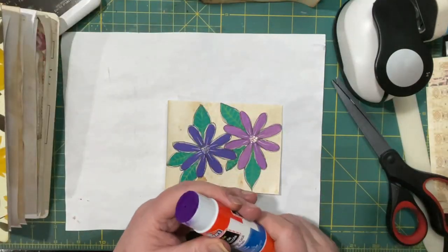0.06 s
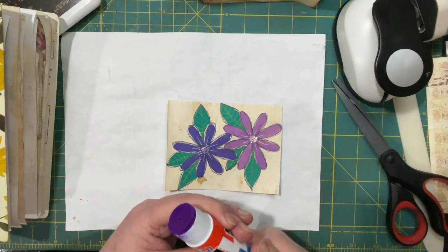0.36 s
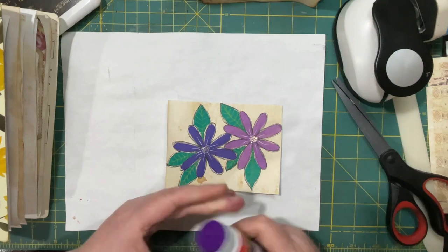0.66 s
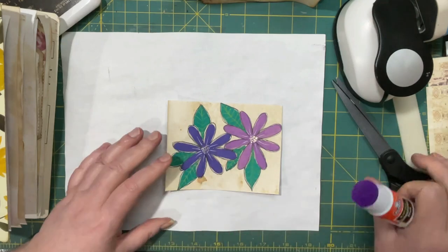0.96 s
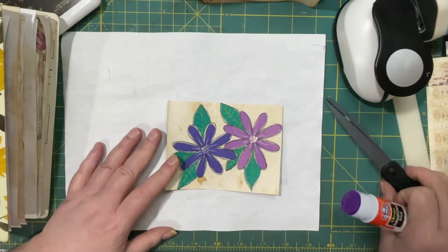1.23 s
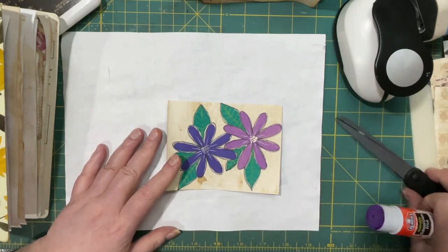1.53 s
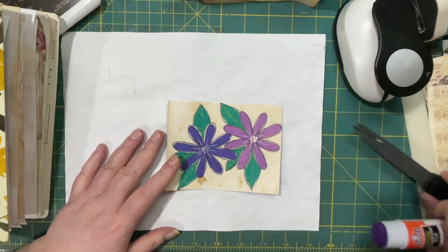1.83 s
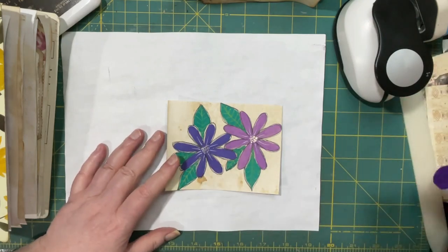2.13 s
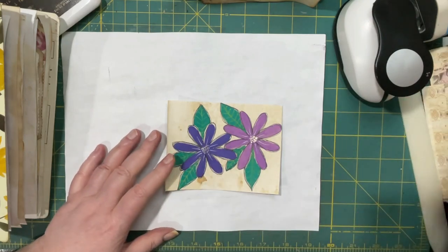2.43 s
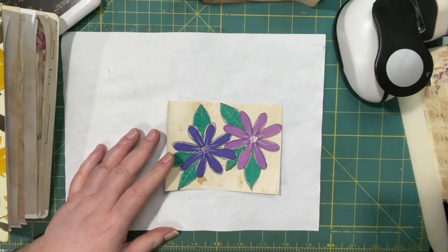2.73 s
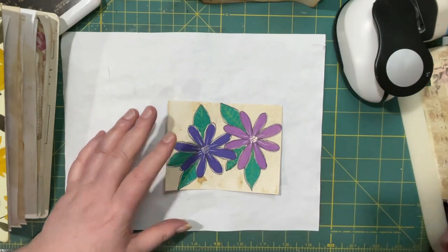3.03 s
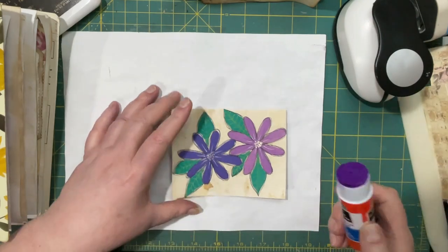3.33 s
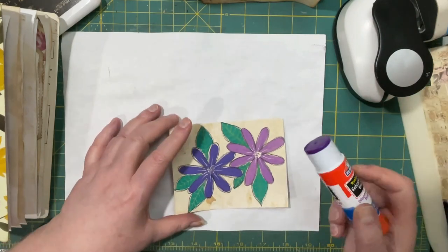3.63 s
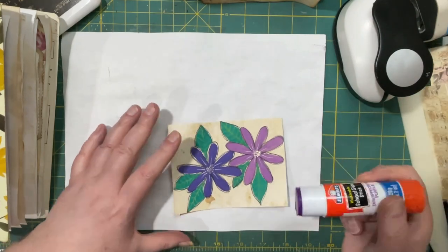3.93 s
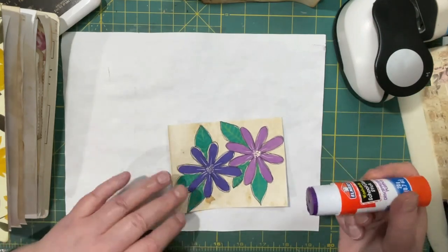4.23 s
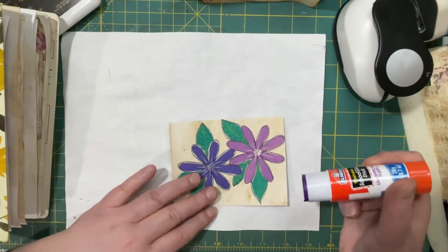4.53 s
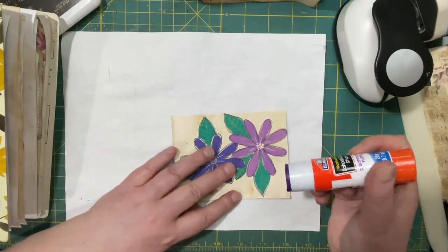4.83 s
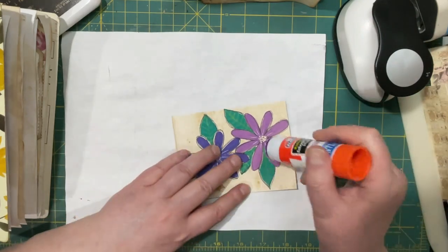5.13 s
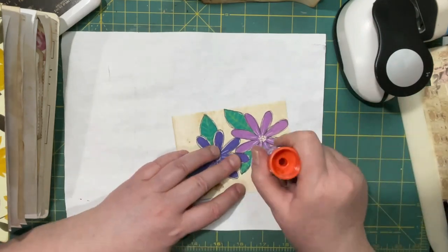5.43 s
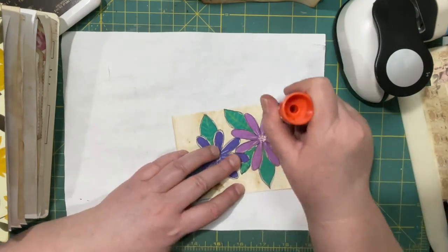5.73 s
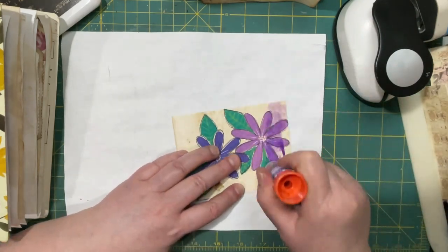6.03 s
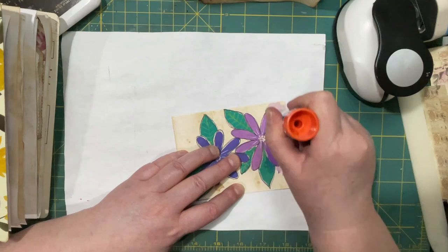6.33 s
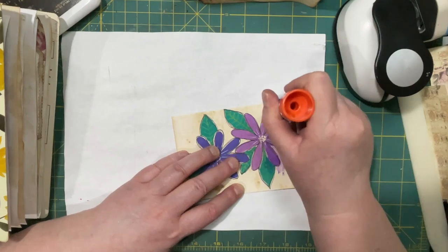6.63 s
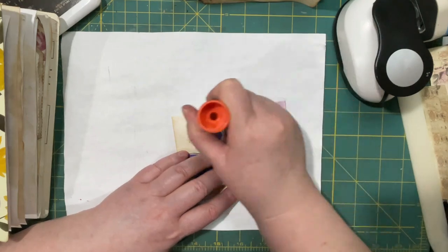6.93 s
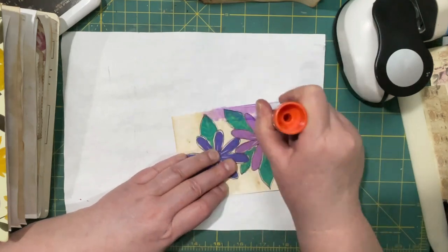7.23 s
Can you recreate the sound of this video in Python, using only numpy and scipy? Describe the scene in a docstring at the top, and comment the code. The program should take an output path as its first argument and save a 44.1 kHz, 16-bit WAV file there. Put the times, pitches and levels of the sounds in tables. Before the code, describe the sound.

Close by on a crafting table in a quiet room, a glue stick's cap comes off with a few faint rubs. The loudest part follows: scissors drag over a mat and clatter against tools in two bursts, with dull table knocks. Then a card swishes across paper as fingernails tap it, and after a soft thump a glue stick smears over the card in repeated, softly ticking strokes.

```python
"""First you hear the cap slide off a glue stick, close by on a crafting table in a small, quiet room.
Scissors judder over the cutting mat, then clack and ring among other tools while the table thumps.
Fingers slide a card over paper: the fibres hiss, and fingernails tap the card. The glue stick lands
with a soft thump and is rubbed about with small tacky ticks. Rubbing is made of many tiny slips;
a knock is a short push that makes an object ring at its own notes (its modes)."""
import sys
import numpy as np
from scipy import signal
from scipy.fft import rfft, irfft
from scipy.io import wavfile
from scipy.ndimage import uniform_filter1d

SR = 44100
rng = np.random.default_rng(int(sys.argv[2]) if len(sys.argv) > 2 else 0)


def transcribe(signal):
    """Save signal, clipped to [-1, 1], as a 16-bit WAV file at the path in sys.argv[1]."""
    frames = np.atleast_2d(signal).T
    limited = np.clip(frames, -1, 1)
    pcm = np.round(limited * 32767).astype(np.int16)
    wavfile.write(sys.argv[1], SR, pcm)


N = 320166
TIME = np.arange(N) / SR
FREQS = np.maximum(np.arange(N // 2 + 1) * SR / N, 1)

# Levels compare rows within a table; each layer then sets its own volume. A decay is a 60 dB fade.
# the room's steady background noise: (frequency [Hz], level [dB])
ROOM_TONE = [(25, -1.5), (45, 6), (90, -2), (260, -9), (480, -5), (750, -12.5), (1050, -8), (1600, -22.5),
             (6000, -33), (15500, -36)]
# how alike the background noise and echoes sound in left and right; the top treble is narrow:
# (frequency [Hz], likeness [about -1 to 1])
LIKENESS = [(80, 0.99), (200, 0.19), (400, 0.021), (800, -1.06), (1500, 0.62), (3500, 0.2), (5000, -0.88),
            (6500, 1)]
# how far the left microphone's wave runs ahead: (frequency [Hz], phase [rad])
MIC_PHASE = [(150, 0), (800, -.7), (1500, 0), (4200, .3), (4750, 3.14), (5200, 6.2), (7500, 7.8),
             (10100, 9.42), (14800, 12.4)]
# how much louder the left microphone is: (frequency [Hz], level [dB])
MIC_BALANCE = [(60, 0), (170, 1.5), (600, 3.8), (1400, 1), (4400, -2.5), (5500, 0)]
# hands leaning on the table: (time [s], level [dB])
LEAN = [(2.6, -70), (3.98, -72), (4.03, -52), (4.16, -98), (4.82, -55), (5.2, -80)]
# the rumble they make: (frequency [Hz], level [dB])
RUMBLE_TONE = [(25, -34), (50, -13.5), (80, 6), (140, -15.5), (300, -13), (800, -26.5)]
# notes of the table top: (frequency [Hz], level [dB], decay [s])
TABLE_MODES = [(86, -3, 0.14), (138, -0.5, 0.13), (175.5, -1.5, 0.16), (250, -2, 0.04), (322, 3.5, 0.074),
               (380.6, -8.5, 0.1), (497, -3, 0.2), (581, -5, 0.12), (771, -4.5, 0.088)]
# soft blows on the table: (time [s], level [dB], contact time [s])
THUMPS = [(1.089, -22.5, 0.0015), (1.112, -22, 0.0056), (1.149, -23, 0.0015), (1.218, -30.5, 0.006),
          (1.334, -27.5, 0.0035), (1.382, -14, 0.0031), (1.388, -22, 0.0011), (1.404, -23.5, 0.0017),
          (1.504, -35, 0.0055), (2.128, -32, 0.013), (2.195, -19.5, 0.0016), (4.022, -42, 0.0095),
          (4.464, -44.5, 0.0097), (5.391, -34, 0.00093), (5.392, -24, 0.0097), (7.229, -35.5, 0.0023)]

# cap twisted and pulled along the tube: (start [s], fastest [s], end [s], level [dB])
CAP_STROKES = [(0.02, 0.055, 0.082, -54), (0.185, 0.215, 0.36, -59.5), (0.445, 0.465, 0.49, -56),
               (0.485, 0.52, 0.56, -54)]
# note of the air in the cap: (time [s], pitch [Hz])
CAP_PITCH = [(0.06, 3000), (0.2, 2380), (0.46, 2520), (0.51, 2610), (0.56, 2790)]
# hiss of the cap's rim: (frequency [Hz], width [Hz], level [dB])
RIM_MODES = [(6760, 370, -10), (7100, 12000, 0), (12120, 340, 3.5)]

# hiss of rubbed paper: (frequency [Hz], level [dB])
PAPER_TONE = [(800, -14), (1600, -8), (3000, -2.5), (4400, -5), (6100, 1.5), (8000, -1.5), (10300, -5.5),
              (12500, -0.5), (14300, -8.5), (15800, -10)]
# a hand sweeping over the paper towards the card: (time [s], level [dB])
REACH = [(0.56, -60), (0.66, -60.5), (0.76, -53.5), (1.15, -49.5), (1.22, -77.5)]
# fingers pushing the card: (start [s], fastest [s], end [s], level [dB], edge bite [dB])
CARD_STROKES = [(2.85, 2.905, 2.944, -56.5, -4.5), (3.0, 3.23, 5.8, -67.5, -8), (3.3, 3.32, 3.39, -42, 1),
                (3.435, 3.485, 3.62, -49.5, -0.5), (3.68, 3.71, 3.806, -55, 3.5),
                (3.87, 3.95, 4.18, -67, -0.5), (4.02, 4.045, 4.01, -44, -4), (4.48, 4.545, 4.605, -46, -2),
                (4.64, 4.68, 4.78, -52, 0), (4.765, 4.81, 4.915, -45.5, 0), (4.95, 5.04, 5.156, -52, -1),
                (5.1, 5.13, 5.21, -55.5, -19)]
# fingernails on card and paper: (time [s], level [dB], brightness [Hz], chatter decay [s])
NAIL_TAPS = [(2.8476, -34.5, 8100, 0.016), (3.2738, -30.5, 3500, 0.046), (3.372, -30, 2607, 0.0096),
             (4.0148, -32.5, 1978, 0.029), (4.465, -32.5, 5937, 0.033)]
# notes of the card: (frequency [Hz], width [Hz], level [dB])
CARD_MODES = [(2200, 330, -2.5), (2960, 670, 0), (6340, 3600, -17)]

# glue stick on the card: (start [s], fastest [s], end [s], hiss [dB], edge bite [dB], smear [dB])
GLUE_STROKES = [(5.31, 5.402, 5.46, -57.5, -3, -59), (5.53, 5.717, 5.76, -63.5, 0, -62.5),
                (5.872, 5.924, 6.05, -63.5, -1, -63), (6.034, 6.042, 6.08, -76, 8, -53.5),
                (6.207, 6.287, 6.44, -67, -3, -66), (6.601, 6.63, 6.78, -64, -5.5, -68),
                (6.696, 6.697, 6.705, -57.5, -6, -79), (6.826, 6.893, 7.02, -54, -6.5, -72),
                (7.035, 7.126, 7.19, -54, 0.5, -63), (7.177, 7.174, 7.27, -67, 3.5, -56.5),
                (7.228, 7.243, 7.26, -68, -6, -46.5)]
# dull smear of soft glue: (frequency [Hz], level [dB])
GLUE_TONE = [(90, 7), (170, -1), (370, 3), (800, -4.5), (1200, -7.5), (2500, -17.5), (6000, -58)]
# glue stick and sticky card ticking: (time [s], level [dB], brightness [Hz], chatter decay [s])
GLUE_TICKS = [(5.2977, -23, 3020, 0.018), (5.3694, -30, 2400, 0.011), (5.3828, -34, 5423, 0.034),
              (5.493, -36, 6060, 0.011), (5.5218, -45, 4600, 0.018), (5.9264, -33.5, 9000, 0.004),
              (5.9788, -28, 9000, 0.008), (6.1497, -39, 9600, 0.0093), (6.176, -30, 10000, 0.019),
              (6.2925, -35, 5000, 0.0085), (6.3015, -21, 6000, 0.012), (6.8312, -32, 9000, 0.0095),
              (7.0177, -29, 7560, 0.0057), (7.0728, -30, 6530, 0.007)]
# notes of the stick's barrel, muffled by the hand: (frequency [Hz], width [Hz], level [dB])
BARREL_MODES = [(800, 400, -7), (1500, 500, -2), (2350, 400, -2), (3120, 550, 0), (4300, 800, -2),
                (5750, 450, 3), (7000, 700, -3), (10500, 4000, -2)]

# notes of the scissors: (frequency [Hz], width [Hz], level [dB])
SCISSOR_MODES = [(334, 60, -4), (503, 30, 4), (754, 40, -1), (1090, 45, 2), (1250, 160, -2),
                 (1490, 200, -2), (1810, 160, -1), (2440, 400, -4), (2900, 300, -6), (4350, 800, -4),
                 (5800, 800, -3), (10500, 4000, -7)]
# scissors dragged over the mat: (time [s], level [dB])
DRAG = [(1.04, -74.5), (1.126, -43), (1.246, -49), (1.42, -41), (1.474, -50.5), (1.622, -56.5),
        (1.95, -82.5)]
# sound of the rubbed mat: (frequency [Hz], level [dB])
MAT_TONE = [(40, -12), (100, 4), (170, -14.5), (340, -12), (520, -6.5), (750, -23), (1150, -13.5),
            (2000, -37.5), (4300, -22), (8000, -25.5)]
# blades skidding: (start [s], fastest [s], end [s], level [dB])
SKIDS = [(1.085, 1.15, 1.1, -42.5), (1.265, 1.275, 1.286, -40.5), (1.488, 1.505, 1.526, -43.5),
         (1.55, 1.585, 1.6, -38.5)]
# scissors shoved in among the tools: (start [s], fastest [s], end [s], level [dB])
SCRAPES = [(1.71, 1.74, 1.8, -58), (1.85, 1.878, 1.887, -50), (2.0, 2.03, 2.46, -60),
           (2.112, 2.125, 2.187, -44.5), (2.19, 2.215, 2.231, -30.5), (2.255, 2.298, 2.327, -42.5),
           (2.33, 2.36, 2.445, -46.5), (2.45, 2.53, 2.58, -47)]
# sound of the scraped tools: (frequency [Hz], level [dB])
TOOLS_TONE = [(150, -5.5), (350, -11.5), (750, -11), (2000, -8.5), (4300, -11), (6000, -11.5),
              (9000, -14.5), (13000, -13), (15500, -26.5)]
# scissors hitting tools: (time [s], level [dB], brightness [Hz], chatter decay [s], tool's note [Hz])
CLACKS = [(1.0705, -26, 997, 0.063, 1060), (1.081, -24, 1400, 0.026, 1130),
          (1.2655, -35.5, 2500, 0.04, 1300), (1.326, -29, 1300, 0.049, 1520),
          (1.3715, -15, 4000, 0.025, 1470), (1.3795, -15.5, 5000, 0.025, 4400),
          (1.3985, -7, 4700, 0.011, 6000), (1.4, -16, 1200, 0.025, 950), (1.4074, -23.5, 2500, 0.021, 1454),
          (1.5722, -16, 10000, 0.01, 8530), (1.583, -26.5, 5000, 0.045, 1150),
          (2.111, -29.5, 1200, 0.027, 1110), (2.149, -17.5, 4112, 0.014, 3900),
          (2.171, -23, 2400, 0.064, 620), (2.192, -26, 626, 0.029, 774), (2.2129, -20.5, 3340, 0.012, 2850),
          (2.353, -26, 900, 0.07, 1250), (2.467, -19, 2200, 0.034, 2350)]


def from_db(db):
    """Turn decibels into a gain to multiply by."""
    return 10 ** (np.asarray(db) / 20)


def rms_one(x):
    """Scale a signal so its average strength (rms) is 1."""
    return x / np.sqrt(np.mean(x ** 2) + 1e-20)


def peak_one(x):
    """Scale a signal so its peak is 1."""
    return x / np.abs(x).max()


def add(track, time_s, sound):
    """Mix a sound into a track at the given time."""
    start = int(time_s * SR)
    track[start:start + len(sound)] += sound[:N - start]


def over_freqs(points):
    """Join a table's points into a curve over all frequencies."""
    hz, value = np.transpose(points)
    return np.interp(np.log(FREQS), np.log(hz), value)


def level(rows):
    """Gain over time from a decibel curve, silent outside it."""
    db = np.interp(TIME, *np.transpose(rows), left=-120, right=-120)
    return uniform_filter1d(from_db(db), size=128)


def filtered(x, kind, hz, order):
    """Keep the lows, the highs or a band; a higher order cuts more sharply."""
    return signal.sosfilt(signal.butter(order, hz, kind, fs=SR, output="sos"), x)


def coloured(x, tone):
    """Shape a signal with a tone table, fading the bass below its first row."""
    bass_fade = 1 / np.sqrt(1 + (0.53 * tone[0][0] / FREQS) ** 4)
    return rms_one(irfft(rfft(x) * from_db(over_freqs(tone)) * bass_fade, N))


def drift(rate_hz):
    """A slow random wobble."""
    return rms_one(irfft(rfft(rng.standard_normal(N)) / (1 + (FREQS / rate_hz) ** 2), N))


def resonate(x, hz, width_hz):
    """Ring at one note; the narrower the width, the longer it rings."""
    r = np.exp(-np.pi * width_hz / SR)
    feedback = [1, -2 * r * np.cos(2 * np.pi * hz / SR), r * r]
    return signal.lfilter(np.array([1, 0, -1]) * (1 - r * r) / 2, feedback, x + 1e-18)


def gliding(x, hz, width_hz):
    """Ring at a note that moves over time."""
    turn = np.exp(2j * np.pi * np.cumsum(hz) / SR)
    r = np.exp(-np.pi * width_hz / SR)
    return 2 * np.real(turn * signal.lfilter([1 - r], [1, -r], x / turn))


def ring(force, modes):
    """An object rings at all its notes, every second one swinging the opposite way."""
    return sum((-1) ** k * from_db(db) * resonate(force, hz, width)
               for k, (hz, width, db) in enumerate(modes))


def friction(per_s, size_db, smooth, judder_db, judder_hz):
    """Tiny slips of uneven size over a smooth hiss; the pressure wavers."""
    slips = (rng.random(N) < per_s / SR) * rng.choice([-1, 1], N)
    sizes = from_db(size_db * np.minimum(rng.exponential(1, N), 4))
    hiss = smooth * rng.standard_normal(N)
    pressure = from_db(judder_db * drift(judder_hz))
    return rms_one((rms_one(slips * sizes) + hiss) * pressure)


def rubbing(tone, **slips):
    """Friction over a broad patch, which each microphone hears a little differently."""
    centre = coloured(friction(smooth=1, **slips), tone)
    spread = from_db(-14) * filtered(coloured(rng.standard_normal(N), tone), "low", 8500, order=4)
    return centre + np.array([spread, -spread])


def patchy(x, depth_db, rate_hz, bands):
    """Each frequency band swells and fades by itself as the contact moves on."""
    place = np.interp(np.log(FREQS), np.log([1000, 15950]), [0, bands - 1])
    spectrum = rfft(x)
    parts = (irfft(spectrum * np.maximum(1 - np.abs(place - k), 0), N) for k in range(bands))
    return rms_one(sum(part * from_db(depth_db * drift(rate_hz)) for part in parts))


def stroke(start, fastest, end):
    """Gain of one rub: it catches, swells to its fastest moment, slows and lets go."""
    swell_db, roundness = 7.5, 1.28   # roundness 1 gives a pointed top, 2 a round one
    fade_db, attack_s, release_s = 18.5, 0.025, 0.052   # times to rise and fall by fade_db
    t = TIME[::32]
    before = (fastest - t) / max(fastest - start, .005)
    after = (t - fastest) / max(end - fastest, .005)
    off_top = np.clip(np.maximum(before, after), 0, 1)
    fade = np.maximum(start - t, 0) / attack_s + np.maximum(t - end, 0) / release_s
    return np.interp(TIME, t, from_db(-swell_db * off_top ** roundness - fade_db * np.minimum(fade, 10)))


def strokes(rows):
    """Gain of a run of rubs, each at its own level."""
    return sum(from_db(db) * stroke(start, fastest, end) for start, fastest, end, db, *_ in rows)


def strikes(rows, modes, crack, chatter, vary_db, order):
    """A hit and its dying chatter ring an object and any tool it strikes; each has its own brightness."""
    out, t = np.zeros(N), TIME[:SR // 4]
    for time_s, db, bright_hz, decay_s, *tool_notes in rows:
        force = chatter * rng.standard_normal(len(t)) * from_db(-60 * t / decay_s)
        force[0] += 1   # the hit itself
        varied = [(hz, width, mode_db + vary_db * rng.normal()) for hz, width, mode_db in modes]
        sound = ring(force, varied) + crack * force
        low, high = np.clip([bright_hz / 1.7, bright_hz * 1.7], 50, 18000)
        sound = filtered(sound, "high", low, order)
        sound = peak_one(filtered(sound, "low", high, order=2))
        tool = sum(peak_one(resonate(force, hz, width_hz=300)) for hz in tool_notes)
        add(out, time_s, from_db(db) * peak_one(sound + from_db(-8) * tool))
    return out


def diffuse(pair):
    """Turn two unrelated signals into sound that arrives from all sides."""
    alike = np.clip(over_freqs(LIKENESS), -.99, .995)
    mid, side = rfft(pair) * np.sqrt([1 + alike, 1 - alike])
    return irfft(np.array([mid + side, mid - side]) / np.sqrt(2), N)


def room_tone():
    """A faint, low, steady noise fills the room."""
    return from_db(-57.5) * diffuse(coloured(rng.standard_normal((2, N)), ROOM_TONE))


def room_echo(x, early_db=-7.5, early_decay_s=0.09, tail_db=-18, tail_decay_s=0.16):
    """Quick, thin echoes bounce off nearby clutter, followed by a short, duller tail."""
    arrived = TIME > .0025
    early = filtered(rng.standard_normal((2, N)), "high", 250, order=2)
    early = rms_one(early * arrived * from_db(-60 * TIME / early_decay_s))
    tail = filtered(rng.standard_normal((2, N)), "band", [200, 3000], order=1)
    tail = rms_one(tail * arrived * from_db(-60 * TIME / tail_decay_s))
    echoes = diffuse(from_db(early_db) * early + from_db(tail_db) * tail) / np.sqrt(N)
    return signal.fftconvolve(x, echoes[:, :SR], axes=1)[:, :N]


def leaning_hands():
    """Hands lean on the table and make it rumble softly."""
    return from_db(0.5) * level(LEAN) * coloured(rng.standard_normal(N), RUMBLE_TONE)


def table_top(force):
    """The table top rings at a few low notes that die quickly."""
    return sum(from_db(db) * decay_s * resonate(force, hz, np.log(1000) / (np.pi * decay_s))
               for hz, db, decay_s in TABLE_MODES)


def thumps():
    """Each blow is a smooth push on the table; a shorter push wakes higher notes."""
    out, t = np.zeros(N), TIME[:SR // 2]
    for time_s, db, contact_s in THUMPS:
        push = np.sin(np.pi * np.minimum(t / contact_s, 1)) ** 2
        add(out, time_s, from_db(db) * peak_one(table_top(push)))
    return out


def cap():
    """The rim rubs along the tube and sounds the hollow cap, whose pitch moves as it slides."""
    rub = friction(per_s=2400, size_db=0, smooth=1, judder_db=2, judder_hz=22)
    pitch = np.interp(TIME, *np.transpose(CAP_PITCH))
    hollow = from_db(5.5) * gliding(rub, pitch, width_hz=470)
    rim = sum(from_db(db) * resonate(rub, hz, width) for hz, width, db in RIM_MODES)
    return from_db(4.5) * strokes(CAP_STROKES) * rms_one(hollow + rim)


def edge_bite(rows):
    """How much the card's edge adds to or takes from the hiss of each rub."""
    return sum(from_db(db) * (from_db(bite_db) - 1) * stroke(start, fastest, end)
               for start, fastest, end, db, bite_db, *_ in rows)


def paper():
    """Fine fibres hiss and coarser ones snag; the card's edge shapes the lower part of the hiss."""
    reach = from_db(3) * level(REACH)
    finger_gain, stick_gain, reach_bite = from_db(4.5), from_db(5.5), from_db(-2) - 1
    speed = reach + finger_gain * strokes(CARD_STROKES) + stick_gain * strokes(GLUE_STROKES)
    bite = reach * reach_bite + finger_gain * edge_bite(CARD_STROKES)
    bite += stick_gain * edge_bite(GLUE_STROKES)
    fibres = rubbing(PAPER_TONE, per_s=3000, size_db=0.5, judder_db=2, judder_hz=11)
    snags = coloured(friction(per_s=240, size_db=1.5, smooth=0, judder_db=2, judder_hz=25), PAPER_TONE)
    grain = patchy(fibres + from_db(-5) * snags, depth_db=2.1, rate_hz=22, bands=10)
    edge = signal.sosfiltfilt(signal.butter(4, [1700, 5100], "band", fs=SR, output="sos"), grain)
    return speed * grain + bite * edge


def nails():
    """Fingernails tap and flick the card, which rings briefly."""
    return from_db(-2) * strikes(NAIL_TAPS, CARD_MODES, crack=0.29, chatter=0.55, vary_db=-2, order=2)


def glue_stick():
    """Soft glue drags dully and crackles as its threads snap; the barrel ticks as it sticks and slips."""
    pressure = sum(from_db(smear_db) * stroke(start, fastest, end)
                   for start, fastest, end, *_, smear_db in GLUE_STROKES)
    rub = friction(per_s=650, size_db=3.5, smooth=1, judder_db=2.5, judder_hz=37)
    smear = from_db(2.5) * pressure * coloured(rub, GLUE_TONE)
    snaps = friction(per_s=45, size_db=2.5, smooth=0, judder_db=2, judder_hz=10)
    crackle = from_db(-3) * strokes(GLUE_STROKES) * rms_one(resonate(snaps, hz=11000, width_hz=8000))
    ticks = strikes(GLUE_TICKS, BARREL_MODES, crack=0.051, chatter=0.36, vary_db=1.5, order=1)
    return smear + crackle + from_db(-1) * ticks


def handle_drag(judder):
    """The scissor handles judder over the mat, ring at their low notes and shake the table."""
    mat = from_db(1) * coloured(judder, MAT_TONE)
    table = from_db(0.5) * rms_one(table_top(judder))
    handles = sum(from_db(db) * resonate(judder, hz, width)
                  for hz, width, db in SCISSOR_MODES if hz < 1400)
    return level(DRAG) * (mat + table + from_db(-11) * rms_one(handles))


def blade_skid(judder):
    """Sliding blades wake mostly the scissors' lower notes and keep one of them singing."""
    force = filtered(judder, "low", 2100, order=1) * strokes(SKIDS)
    singing = -from_db(7) * resonate(force, hz=1092, width_hz=36)   # minus: in step with the same mode
    return from_db(15.5) * (ring(force, SCISSOR_MODES) + singing)


def tool_scrape():
    """The scissors scrape in among the tools; a hard shove wakes the table top."""
    grit = rubbing(TOOLS_TONE, per_s=2000, size_db=1.5, judder_db=2, judder_hz=62)
    push = strokes(SCRAPES)
    table = resonate(grit, hz=357, width_hz=49) + from_db(-1) * resonate(grit, hz=723, width_hz=50)
    return from_db(2) * push * grit + from_db(13.5) * push ** 1.64 * rms_one(table)


def scissors():
    """The scissors drag and skid over the mat, and scrape and clack against the tools."""
    judder = friction(per_s=300, size_db=1.5, smooth=0.58, judder_db=1.5, judder_hz=22)
    sliding = handle_drag(judder) + blade_skid(judder) + tool_scrape()
    clacks = strikes(CLACKS, SCISSOR_MODES, crack=0.17, chatter=0.28, vary_db=4, order=1)
    return sliding + from_db(-0.5) * clacks


def scene():
    """Everything on the table, with its echo and the room's steady noise."""
    near = leaning_hands() + paper() + nails() + cap() + scissors() + glue_stick() + thumps()
    return near + room_echo(near) + room_tone()


def record(dry):
    """The two microphones differ in phase and level; the deepest bass and highest treble are cut."""
    left = from_db(over_freqs(MIC_BALANCE) / 2) * np.exp(1j * over_freqs(MIC_PHASE) / 2)
    right = 1 / left
    treble_cut = 1 / np.sqrt(1 + (FREQS / 15950) ** 300)
    dry = filtered(dry, "high", 35, order=4)
    return irfft(rfft(dry) * np.array([left, right]) * treble_cut, N)


dry = scene()
out = record(dry)
transcribe(out)
```